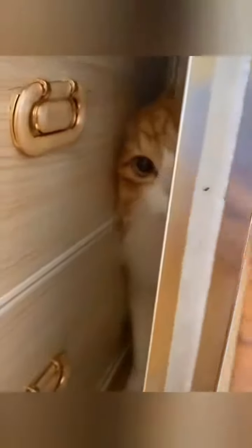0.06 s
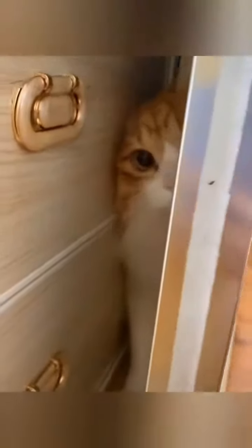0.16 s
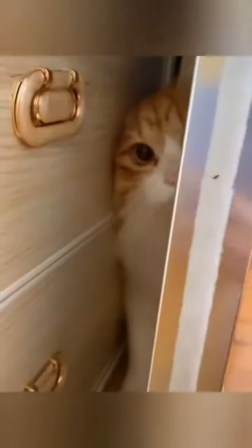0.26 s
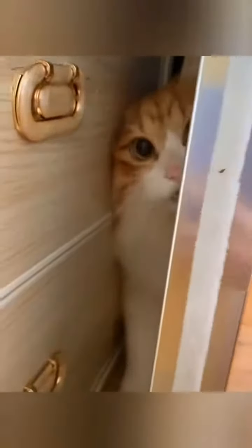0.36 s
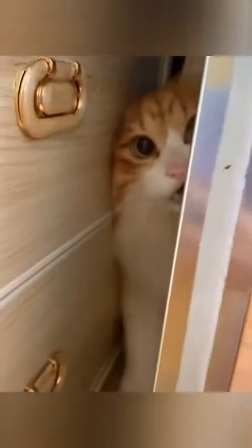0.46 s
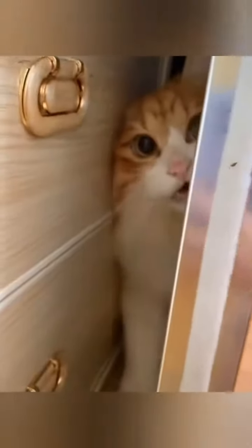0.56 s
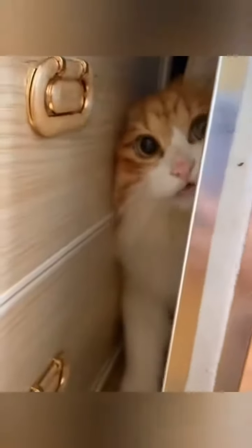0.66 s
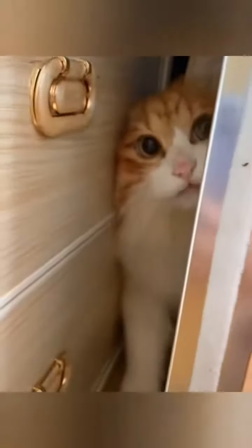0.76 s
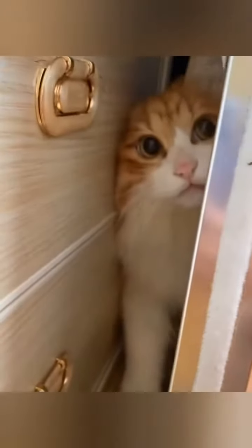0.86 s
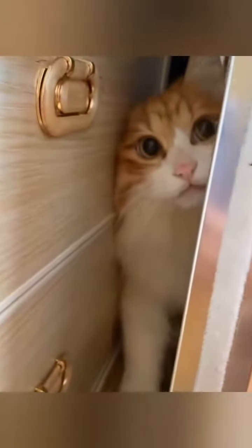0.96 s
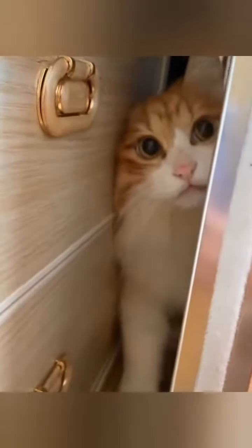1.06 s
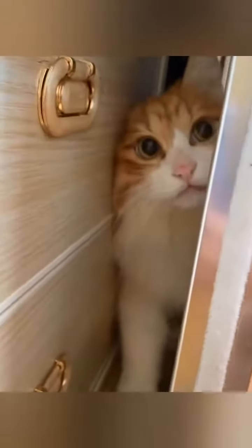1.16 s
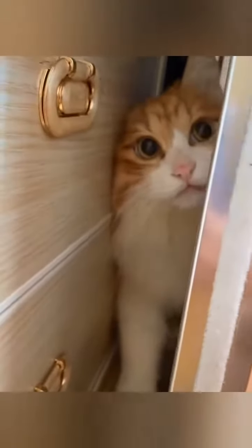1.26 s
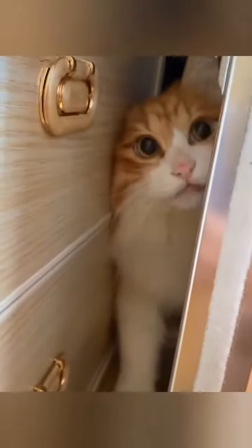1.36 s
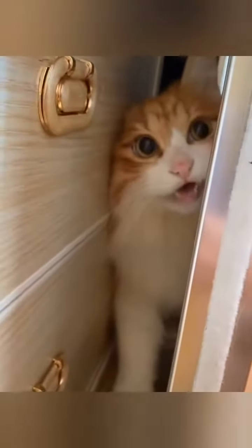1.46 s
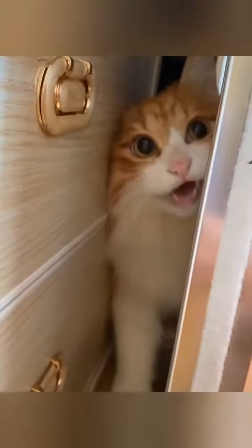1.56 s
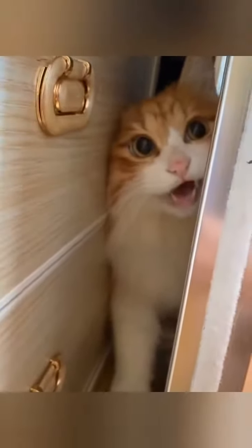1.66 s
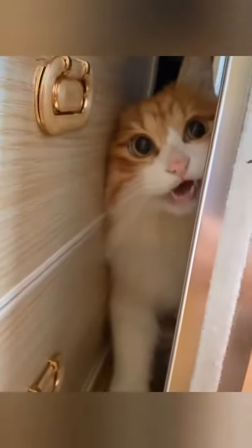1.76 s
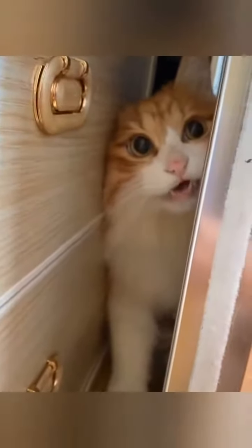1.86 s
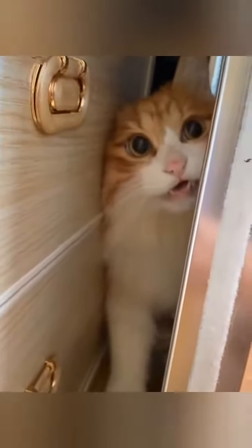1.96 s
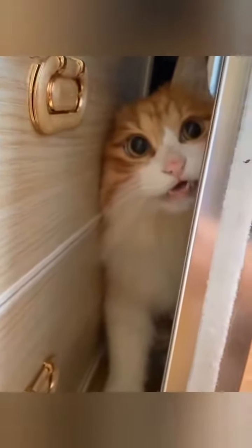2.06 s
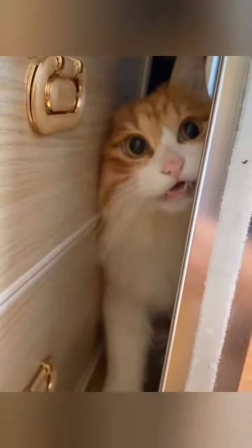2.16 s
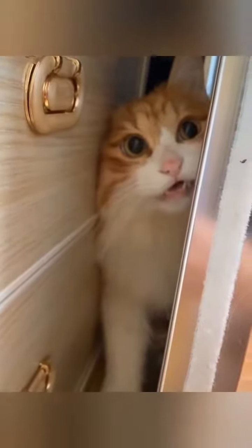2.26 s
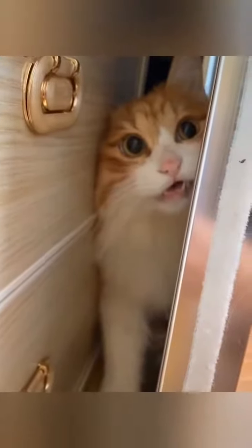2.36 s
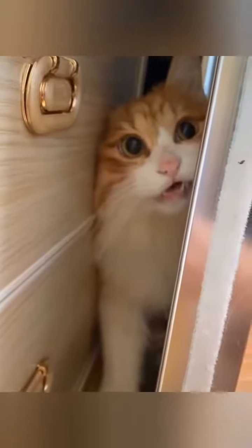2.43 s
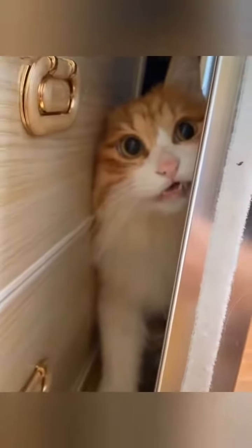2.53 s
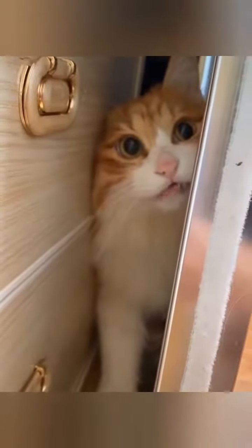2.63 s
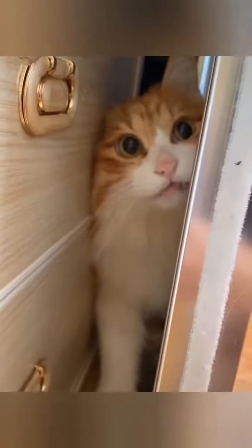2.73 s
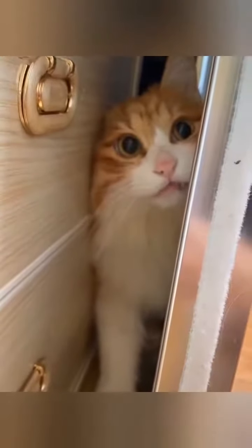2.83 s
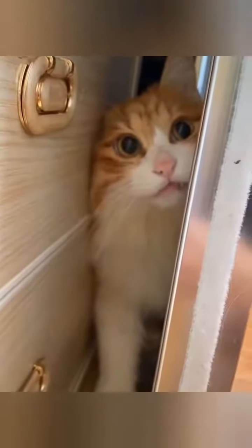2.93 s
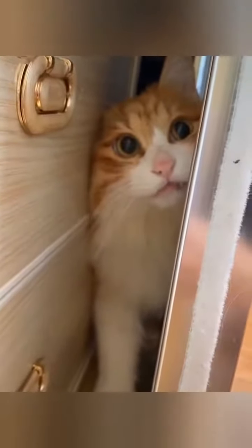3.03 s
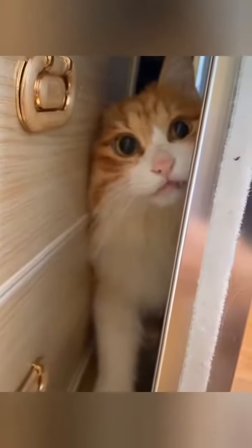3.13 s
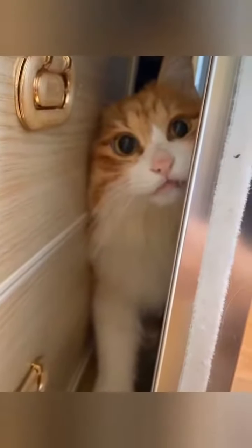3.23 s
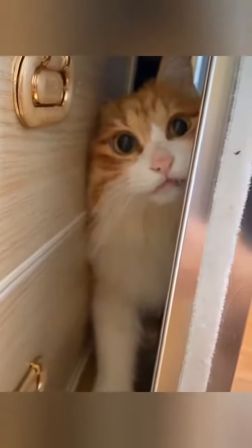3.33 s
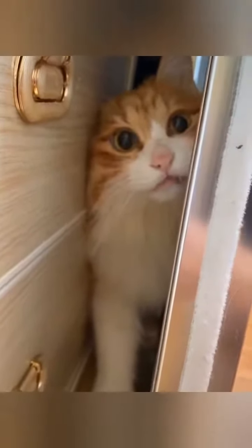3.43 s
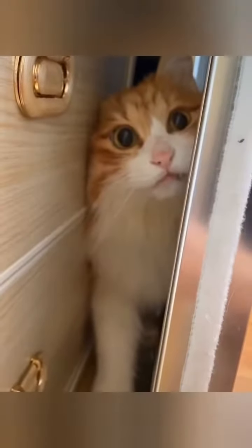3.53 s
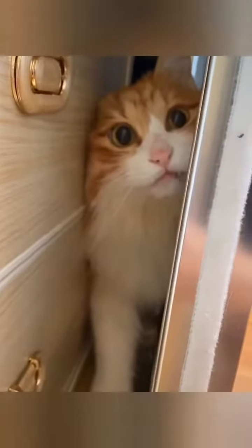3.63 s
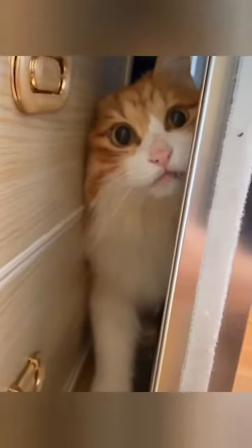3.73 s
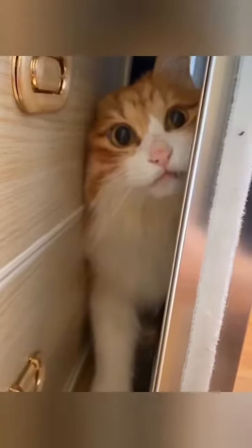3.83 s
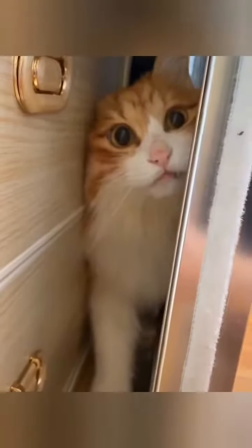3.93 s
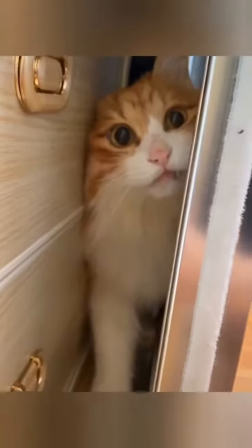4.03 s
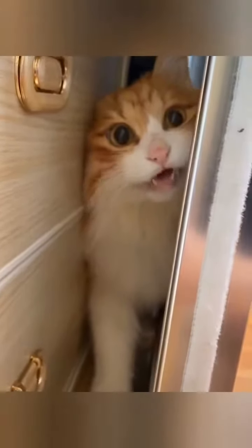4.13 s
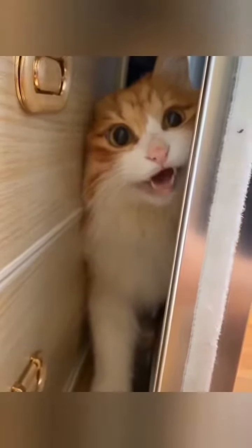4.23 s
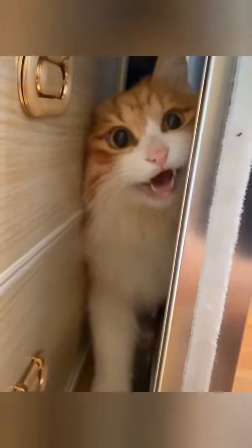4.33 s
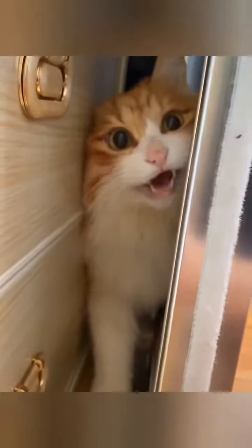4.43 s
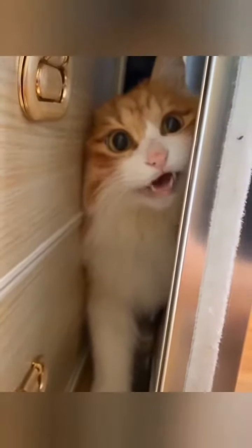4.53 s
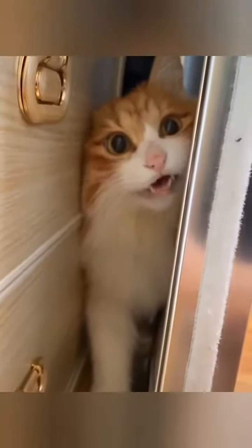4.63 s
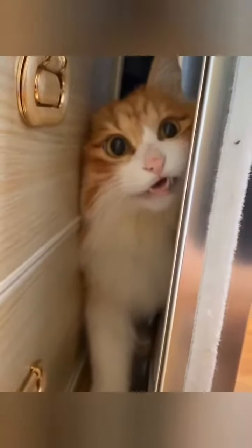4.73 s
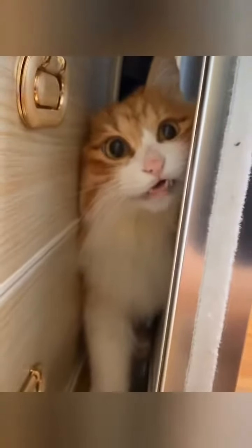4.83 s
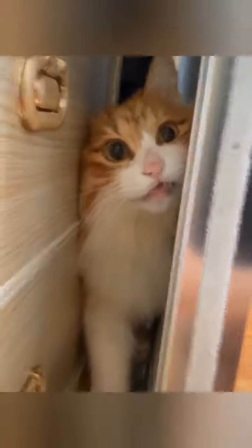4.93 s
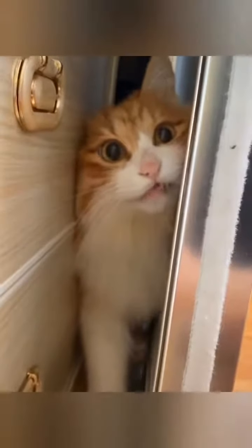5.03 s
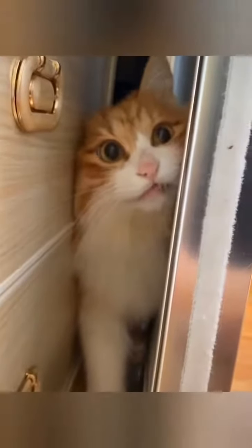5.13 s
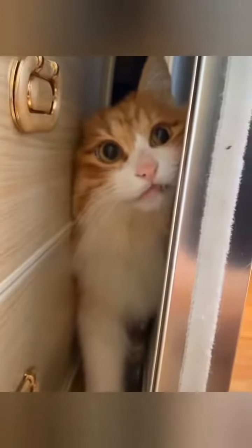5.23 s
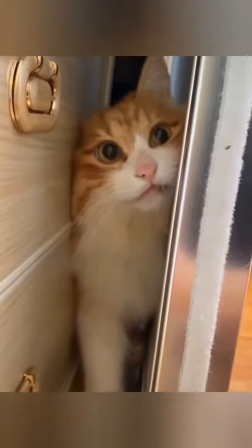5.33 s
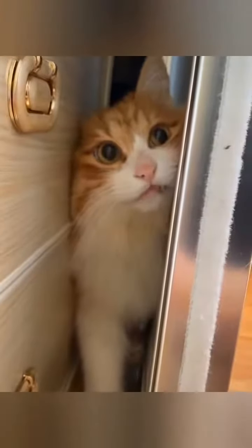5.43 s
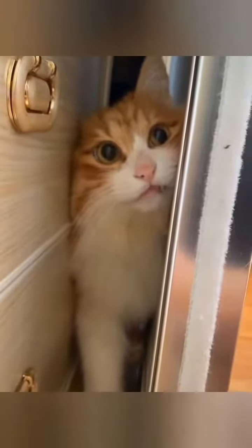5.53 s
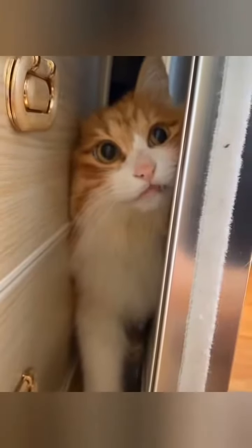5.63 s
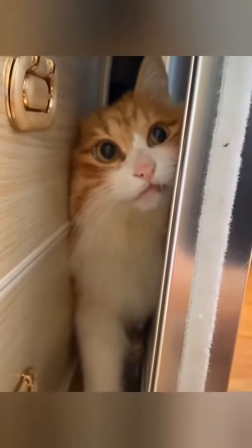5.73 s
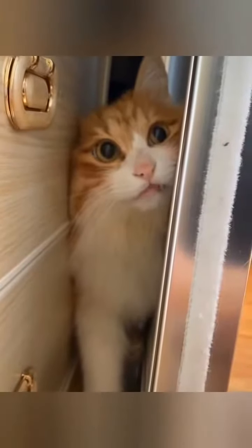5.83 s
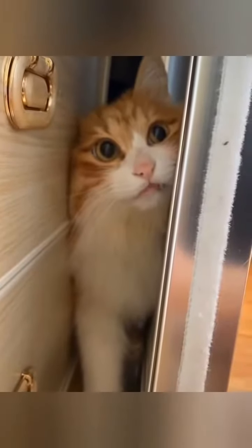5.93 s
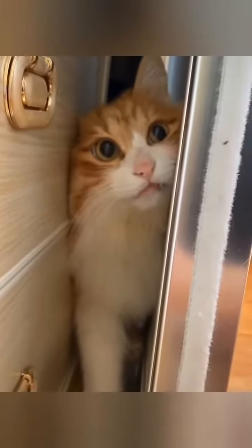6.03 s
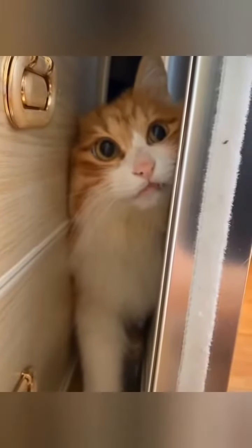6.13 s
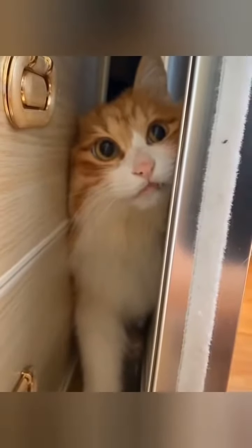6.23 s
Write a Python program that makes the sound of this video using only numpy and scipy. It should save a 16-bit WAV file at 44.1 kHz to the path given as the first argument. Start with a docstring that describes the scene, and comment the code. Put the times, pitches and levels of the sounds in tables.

```python
"""A low room hum runs throughout, swelling and sinking, with treble that settles; faint low tones come and go.
From about half a second, a cat squeezed between a chest of drawers and a sliding door meows four times.
Its voice is a stack of partials on a gliding pitch, with puffs of filtered noise as breath. Three calls break
off in creaks and a puff; damped rings make the creaks and low gulps, and rings with noise the lip smacks.
The narrow gap tilts the voice between left and right; their phase is set at each frequency."""
import sys
import numpy as np
from scipy import signal
from scipy.fft import rfft, irfft
from scipy.io import wavfile
from scipy.ndimage import uniform_filter1d

SR = 44100
rng = np.random.default_rng(int(sys.argv[2]) if len(sys.argv) > 2 else 0)


def persist_wave(psi):
    """Save psi, clipped to +-1, as 16-bit WAV."""
    counts = np.round(np.clip(psi, -1, 1) * 32767).astype(np.int16)
    wavfile.write(sys.argv[1], SR, np.atleast_2d(counts).T)


def volts(x):
    """Linear amplitude factor 10**(x/20) for a level x in dB, scalar or array-like."""
    e = np.asarray(x, float) / 20
    return 10 ** e


N = 276948  # length of the scene in samples


def evened(x):
    """Scales to rms 1."""
    return x / np.sqrt(np.mean(x ** 2) + 1e-20)


def read(points, hz):
    """Reads every column of a table over log frequency."""
    f, *columns = np.transpose(points)
    return np.squeeze([np.interp(np.log(hz + 1), np.log(f + 1), c) for c in columns])


def add(mix, s, sound):
    """Mixes a sound in at time s."""
    part = mix[round(s * SR):][:len(sound)]
    part += sound[:len(part)]


def unroll(rows):
    """Turns a curve into its start time and one value per sample for each column."""
    s, *columns = np.transpose(rows)
    t = np.arange(s[0], s[-1], 1 / SR)
    return s[0], [np.interp(t, s, c) for c in columns]


def wobble(length, size):
    """Smooth random wavering of rms 1; a larger size makes it slower."""
    noise = rng.standard_normal(length)
    return evened(uniform_filter1d(uniform_filter1d(noise, size), size))


def bump(hz, centre, width):
    """A resonance curve that is 1 at its centre."""
    return 1 / (1 + (2 * (hz - centre) / width) ** 2)


# colour of the hum: frequency_hz, relative_level_db (per Hz)
ROOM_COLOUR = [(20, -47), (32, -11.5), (50, -6.5), (85, -9), (160, -4), (260, -10), (420, -15),
               (725, -16.5), (985, -15.5), (1400, -24), (2300, -36), (3100, -41), (5000, -52.5),
               (7100, -58), (11700, -63.5), (15500, -92)]
# standing waves of the room: frequency_hz, width_hz, lift_db
STANDING_WAVES = [(65.1, 16, 8), (113.5, 36, 8.5), (151.4, 4, 5.5), (211.3, 11.3, 8), (257.8, 12, 6.5),
                  (350, 14, 4.5), (977, 290, 3), (1252, 150, 2.5), (2200, 690, 5)]
# how the hum swells and sinks: time_s, change_db
HUM_SWELL = [(0, 1), (.35, 0.5), (.9, 2.5), (1.4, -1), (1.8, -0.5), (2.2, 1.5), (2.7, -1), (3.2, 1),
             (3.6, 0.5), (4.0, -1), (4.8, -1), (5.3, -2), (5.6, -1), (6.28, -2.5)]
# likeness and phase of the left and right channels; above 7 kHz nearly one signal, opposed or in step:
# frequency_hz, likeness_share, left_lead_radians
CHANNEL_LIKENESS = [(60, .99, 0), (170, .98, 0), (340, .8, -.2), (520, .55, -1.1), (780, .4, -2),
                    (1300, .35, -2.2), (1600, .15, -3), (2200, .4, -4), (3100, .5, -3.7), (4800, .2, -6),
                    (6000, .25, -4.3), (7200, .85, -3.1), (8400, .85, -3.1), (9400, .9, 0), (11800, .9, 0),
                    (12500, .8, 2.8)]
# balance of the room between left and right: frequency_hz, left_minus_right_db
ROOM_BALANCE = [(60, -1), (180, 1.0), (550, 4.5), (1650, 0), (4970, 0), (15000, 1.5)]
ROOM_DB, SWELL_DB, RUMBLE_DB = -39, -0.2, 3  # base level, slow random swell, extra rumble
RUMBLE_SHARE, TOP_SHARE = 0.83, 0.16  # how far rumble (extra) and upper bands follow the hum
TREBLE_DB, TREBLE_FADE_S = 8.5, 3.24  # the treble starts this much brighter and settles


def room():
    """Slowly swelling low hum: random noise frames with standing-wave bumps."""
    frames, hz = N // 512 + 5, np.fft.rfftfreq(2048, 1 / SR)
    a, b, c, d, patches = rng.standard_normal((frames, 1025, 5)).T
    patches = uniform_filter1d(patches, size=3, axis=0)
    patches = evened(uniform_filter1d(patches, size=14, axis=1))
    t = np.arange(frames) * 512 / SR
    hum_db = np.interp(t, *np.transpose(HUM_SWELL))
    colour_db = read(ROOM_COLOUR, hz)
    colour_db = colour_db + sum(db * bump(hz, f, w) for f, w, db in STANDING_WAVES)
    colour_db -= 10 * np.log10(np.sum(volts(2 * colour_db)))  # total power 1

    bass = 1 / (1 + (hz / 300) ** 4)
    low = 1 / (1 + (hz / 95) ** 6)
    high = 1 / (1 + (1600 / (hz + 1)) ** 4)
    field_db = colour_db[:, None] + ROOM_DB + SWELL_DB * wobble(frames, size=25)
    field_db += np.outer(bass + TOP_SHARE * (1 - bass), hum_db)
    field_db += np.outer(high, TREBLE_DB * np.exp(-t / TREBLE_FADE_S))
    # the sound as stored is patchy in time and frequency, less so in the bass
    field_db += 2.88 * (1 - 0.77 * bass[:, None]) * patches
    field_db += np.outer(low, RUMBLE_DB + RUMBLE_SHARE * hum_db)

    same, lead = read(CHANNEL_LIKENESS, hz)[..., None]
    shared, separate = a + 1j * b, c + 1j * d
    lean = volts(read(ROOM_BALANCE, hz) / 2)[:, None] * np.exp(.5j * lead)
    left = lean * shared
    right = (same * shared + np.sqrt(1 - same ** 2) * separate) / lean
    spectrum = np.array([left, right]) * volts(field_db)
    return signal.istft(spectrum, nperseg=2048, noverlap=1536)[1][:, :N]


# faint low tones: start_s, length_s, pitch_hz, level_db (rms at the height of the swell)
LOW_TONES = [(0.37, 0.28, 152, -36), (0.24, 0.28, 230, -44.5), (.73, 0.38, 310, -50.5),
             (2.8, 0.32, 450, -54.5)]


def tones():
    """Faint sines that waver in pitch, swell and fade."""
    out = np.zeros(N)
    for start, length, hz, db in LOW_TONES:
        size = round(length * SR)
        swell = np.sin(np.pi * np.arange(size) / size) ** 1.03
        turns = np.cumsum(hz * (1 + 0.0066 * wobble(size, size=900))) / SR
        add(out, start, np.sqrt(2) * volts(db) * swell * np.sin(2 * np.pi * turns))
    return out


# colour of the breath through the mouth: frequency_hz, relative_level_db (per Hz)
BREATH_COLOUR = [(300, -7.5), (600, 1), (1200, 0), (2000, -10.5), (2650, 4.5), (3400, -8.5), (4200, -16.5),
                 (4750, -17), (5500, -18.5), (6600, -11), (7800, -20.5), (10000, -40), (14300, -29.5),
                 (15800, -49.5)]


def breath(db):
    """Turbulent air with wet crackle, coloured by the mouth."""
    clicks = rng.random(len(db)) < 400 / SR  # about 400 a second
    crackle = 3.5 * rng.exponential(1, len(db)) * clicks
    colour = volts(read(BREATH_COLOUR, np.fft.rfftfreq(len(db), 1 / SR)))
    air = rfft(rng.standard_normal(len(db)) + crackle) * colour
    return evened(irfft(air, len(db))) * volts(db + 3.5 * wobble(len(db), size=150))


# puffs of air as the vocal folds open or let go: peak_s, level_db, rise_s, fall_s
BREATH_PUFFS = [(0.484, -44, 0.022, 0.07), (.645, -40, .06, 0.071), (1.571, -55, 0.018, 0.13),
                (1.79, -58, .02, .1), (2.36, -46, 0.038, .06), (2.582, -39.5, .07, 0.072),
                (4.27, -57.5, 0.0074, 0.23), (4.96, -55, .02, .04), (4.995, -38.5, .025, 0.12)]
PUFF_EDGE_DB = -25.5  # a puff starts and ends this far below its peak, before the edges are faded


def puff(s, db, rise, fall):
    """A burst of breath that swells to a rounded top and dies away."""
    t = np.arange(-rise, fall, 1 / SR)
    distance = abs(t / np.where(t < 0, rise, fall))  # 0 at the peak, 1 at either end
    air = breath(db + PUFF_EDGE_DB * distance ** 1.08)
    return s - rise, air * signal.windows.tukey(len(t), .3)


# one curve a meow: time_s, pitch_hz, effort_db,
# tilt_db (of the upper partials against the first, per octave),
# even_db (lift of the 2nd and 4th partials as the cycle grows lopsided)
MEOW_CURVES = [
    [(0.479, 830, -38, 7, 4), (0.487, 828, -30.5, -1, 5.7), (0.5, 816.6, -32, 1.5, 12.5),
     (0.515, 788, -29.5, 2.3, 5.5), (0.53, 763.8, -26.5, 5, -5.5), (0.55, 738.9, -23.5, 3, -6.5),
     (0.575, 745.6, -24.4, 2, -15), (0.6, 757, -27.5, -1.0, -2), (0.62, 813, -31.5, -4.5, -5.3),
     (0.631, 795, -39.5, 6, 6)],
    [(1.566, 814, -32, 4.5, 1.9), (1.574, 765, -28, 1.1, 4), (1.6, 812, -32, 4.5, 8),
     (1.64, 836, -25.7, 1.5, 0.3), (1.68, 831.6, -24, -1.4, -0.5), (1.73, 794, -37, 3.9, 9.5),
     (1.78, 782, -30.5, 1.5, -2.2), (1.85, 774.3, -28, -3, -4.6), (1.9, 772, -30.5, -9.5, 2),
     (1.932, 797, -41, -19.5, 6)],
    [(2.352, 821, -30.5, -2.5, 12), (2.36, 784, -28, 0.2, 9.5), (2.372, 738, -22, -0.2, -3),
     (2.39, 745.4, -20, -0.5, -4.5), (2.43, 756, -22.5, -0.3, 1.5), (2.46, 740, -20.5, -4, -0.2),
     (2.5, 740, -19.5, -7, -2), (2.54, 723, -21, -4, -15), (2.558, 736, -37.5, -2, -3)],
    [(4.266, 857, -39, 9, 4), (4.273, 763.4, -25, -0.5, 5), (4.29, 796, -34, 7, 3.5),
     (4.312, 824, -25, 4, -1.5), (4.34, 835, -24.5, 2.5, -2.5), (4.39, 829, -21.5, -1.1, -2.5),
     (4.43, 803.5, -34.5, 4.5, 0.5), (4.48, 791, -34.2, 5, -3), (4.54, 778.8, -25.5, -0.2, -7.5),
     (4.6, 770.4, -26.5, -3.5, -9), (4.67, 765.8, -28, -2, -6), (4.78, 756.6, -25, -3, -6.5),
     (4.87, 739.5, -24, -8, -4.5), (4.94, 730.7, -27.5, -9.5, -3.5), (4.962, 704, -30, -5.5, 3),
     (4.988, 698, -28.5, -18, -3)],
]
# mouth shape of each meow: resonance_lift_db, treble_lift_db
MOUTH_SHAPES = [(3, -3), (0.5, 3.5), (0, 5), (-0.5, -1.5)]
# colour of the voice through throat and mouth: frequency_hz, lift_db
VOICE_COLOUR = [(700, -1.2), (850, 0.2), (1450, -11), (1550, -16), (1680, -14.9), (2100, -11.5),
                (2230, -6.5), (2520, -3.5), (2950, -13), (3150, -18.5), (3380, -18), (3700, -23),
                (4150, -25), (4500, -36.5), (5000, -32), (5400, -56), (5800, -44), (6200, -38.5),
                (6800, -37.5), (8000, -48), (9500, -64), (11500, -67.5), (14000, -58.5)]
RESONANCE_HZ, RESONANCE_WIDTH_HZ, TREBLE_HZ = 2250, 520, 5500
JITTER, SHIMMER_DB = .0012, .45  # quick wavering of pitch (share) and of partials (dB, more on higher ones)
HOARSE, HOARSE_START, HOARSE_END = .075, .3, .3  # share at the fifth partial: held, extra at start and end
START_S, END_S = .09, .03  # how long the extra hoarseness lasts
FADING = .15  # share of the fourth partial that drifts slowly, more higher up
LATE_DB, LATE_S = -1, 0.019  # each higher partial starts this much weaker and catches up
LEAK_DB, LEAK_OCTAVES = -38.5, 1.4  # air leaking with the voice, and how it follows the tilt


def wander(length, share, size):
    """A steady 1 of which a share is replaced by complex random drift."""
    drift = wobble(length, size) + 1j * wobble(length, size)
    return np.sqrt(1 - share ** 2) + share * np.sqrt(.5) * drift


def meow(rows, lift_db, treble_db):
    """Fold vibration: partials on one pitch; uneven cycles smear noise around each, most around the high ones."""
    start, (hz, effort_db, tilt_db, even_db) = unroll(rows)
    size = len(hz)
    t = np.arange(size) / SR
    hoarse = HOARSE + HOARSE_START * np.exp(-(t / START_S) ** 2)
    hoarse += HOARSE_END * np.exp((t - t[-1]) / END_S)
    turns = np.cumsum(hz * (1 + JITTER * wobble(size, size=60))) / SR
    voice = 0
    for k in range(1, 20):
        db = effort_db + tilt_db * np.log2(min(k, 9)) + even_db * (k in (2, 4))
        db += read(VOICE_COLOUR, k * hz)
        db += lift_db * bump(k * hz, RESONANCE_HZ, RESONANCE_WIDTH_HZ)
        db += treble_db / (1 + (TREBLE_HZ / (k * hz)) ** 4)
        db += LATE_DB * k * np.exp(-t / LATE_S)
        db += SHIMMER_DB * min(k, 9) * wobble(size, size=500)
        uneven = wander(size, np.minimum(hoarse * (k / 5) ** 1.5, .9), size=50)
        fade = wander(size, min(FADING * max(k - 3, 0) ** .5, .6), size=1200)
        partial = fade * uneven * np.exp(2j * np.pi * (k * turns + rng.random()))
        voice = voice + volts(db) * partial.real
    leak = breath(effort_db + LEAK_OCTAVES * tilt_db + LEAK_DB)
    return start, (np.sqrt(2) * voice + leak) * signal.windows.tukey(size, 200 / size)


def ring(hz, width):
    """A damped cycle train that swells over its first cycles."""
    t = np.arange(2000) / SR
    swell = 1 - np.exp(-(0.81 * hz * t) ** 2)
    return np.sin(2 * np.pi * hz * t) * np.exp(-np.pi * width * t) * swell


# single creaks of the vocal folds: start_s, level_db
FOLD_CREAKS = [(0.6278, -31), (0.6315, -23.5), (0.6359, -25.5), (1.57, -32), (1.614, -39), (2.352, -34),
               (2.386, -42), (2.5395, -22), (2.548, -22.5), (2.5526, -30), (4.265, -37.5), (4.312, -36),
               (4.961, -35), (4.989, -21.5), (4.9935, -26.5), (5.012, -32)]
# throat resonances rung by each creak: frequency_hz (before a random rise), width_hz, relative_level_db
THROAT_RINGS = [(2386, 346, 8), (2705, 260, 2), (3170, 220, -18.5), (4060, 630, -18), (6660, 700, -14.5)]


def creak(db):
    """One pulse of the folds rings every throat resonance, each up to 5 % higher by chance."""
    return volts(db) * sum(volts(d) * ring(hz * rng.uniform(1.0, 1.05), w) for hz, w, d in THROAT_RINGS)


# low gulps as the mouth shuts: start_s, level_db, pitch_hz
MOUTH_GULPS = [(0.645, -26.5, 373), (2.569, -21.5, 390), (2.6, -34, 513), (4.959, -13.5, 1260),
               (4.958, -16, 265), (4.9635, -8.5, 716), (4.971, -34, 397), (4.984, -19, 350),
               (4.988, -21.5, 113.4), (4.997, -21.5, 350), (5.006, -22, 292), (5.01, -23, 113.7)]


def gulp(db, hz):
    """A low, quickly damped ring."""
    return volts(db) * ring(hz, 0.18 * hz)


# lip smacks, and a brief bright hiss at the top of the third call's closing puff:
# start_s, level_db, ringing_hz
SMACKS_AND_HISS = [(1.353, -46.5, 14500), (1.364, -43, 4740), (1.7852, -34.5, 7950), (1.7847, -36, 5400),
                   (2.575, -50.5, 14300), (2.576, -50.5, 6030), (4.071, -41, 4800), (4.087, -49, 9700),
                   (4.956, -47, 5550), (5.14, -59, 9350)]


def smack_or_hiss(db, hz):
    """A snap of bright noise with a short ring; in a smack, the snap is the wet film bursting."""
    n = np.arange(2000)
    snap = rng.standard_normal(2000) * (np.exp(-n / 40) + 0.1 * np.exp(-n / 600))
    return volts(db) * (ring(hz, 250) + 0.24 * np.diff(snap, prepend=0))


def cat():
    """Voice, breath, creaks, gulps and smacks together at the mouth."""
    out = np.zeros(N)
    for row in BREATH_PUFFS:
        add(out, *puff(*row))
    for rows, shape in zip(MEOW_CURVES, MOUTH_SHAPES):
        add(out, *meow(rows, *shape))
    for s, db in FOLD_CREAKS:
        add(out, s, creak(db))
    for s, db, hz in MOUTH_GULPS:
        add(out, s, gulp(db, hz))
    for s, db, hz in SMACKS_AND_HISS:
        add(out, s, smack_or_hiss(db, hz))
    return out


# balance of the cat between left and right: frequency_hz, left_minus_right_db
GAP_BALANCE = [(200, 7.5), (740, 8.5), (780, 3.5), (830, -1.5), (1480, 0.5), (1670, 6), (2220, 1.5),
               (2350, -7), (2500, -7), (2950, -3.5), (3330, 8), (3800, -1), (4150, 4), (4600, 2.5),
               (7000, -3)]
# phase between left and right at each frequency; above 7 kHz the channels are plainly opposed or in step:
# frequency_hz, left_lead_radians
CAT_PHASE = [(200, 0), (740, -.9), (830, -1.7), (1480, -.1), (1670, -.6), (2220, -.9), (2500, -2.3),
             (2950, -3.5), (3330, -3.9), (3800, -6.2), (4600, -7.2), (5000, -6.4), (6400, -4.2),
             (7000, -3.1), (8400, -3.1), (9400, 0), (11800, 0), (12500, 2.5)]


def gap(x):
    """Reflections in the narrow gap tilt the balance; left and right also differ in phase at each frequency."""
    hz = np.fft.rfftfreq(N, 1 / SR)
    half = volts(read(GAP_BALANCE, hz) / 2) * np.exp(.5j * read(CAT_PHASE, hz))
    return irfft(rfft(x) * np.array([half, 1 / half]), N)


ECHO_DB, ECHO_T60_S = -18.5, 0.21  # level, and time to die away by 60 dB


def echo(x):
    """Short ring of the furniture around the cat: dense weak reflections, different at left and right."""
    t = np.arange(SR // 4) / SR
    tail = rng.standard_normal((2, len(t))) * volts(-60 * t / ECHO_T60_S) * (t > .003)
    tail = tail / np.linalg.norm(tail[0])
    return volts(ECHO_DB) * signal.fftconvolve(x[None], tail, axes=1)[:, :N]


def scene():
    """The cat in its gap over the room."""
    mouth = cat()
    return room() + tones() + gap(mouth) + echo(mouth)


def band_limit(x):
    """A steep low-pass at the top of the band."""
    return signal.sosfilt(signal.butter(12, 16070, fs=SR, output="sos"), x)


def record(dry):
    """The two-port microphone drops the deepest bass, below about 42 Hz."""
    bass_cut = signal.butter(2, 42, "high", fs=SR, output="sos")
    mix = signal.sosfilt(bass_cut, dry)
    return band_limit(mix)


dry = scene()
out = record(dry)
persist_wave(out)
```